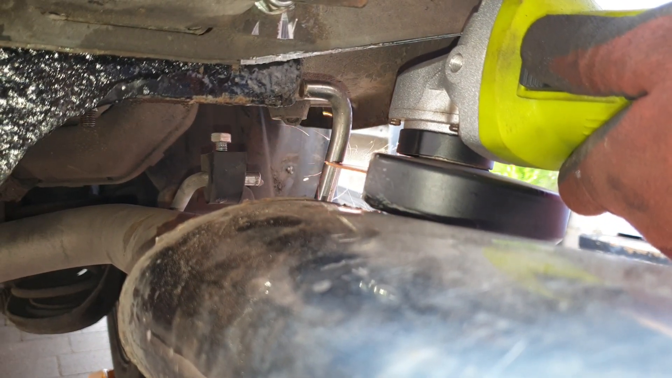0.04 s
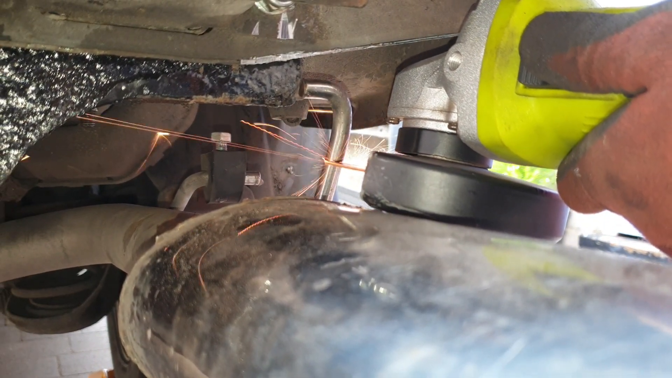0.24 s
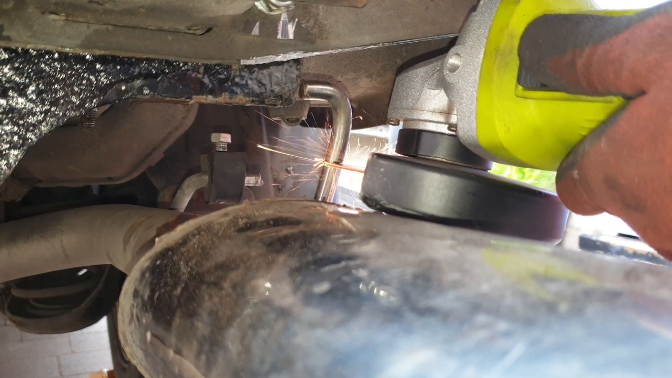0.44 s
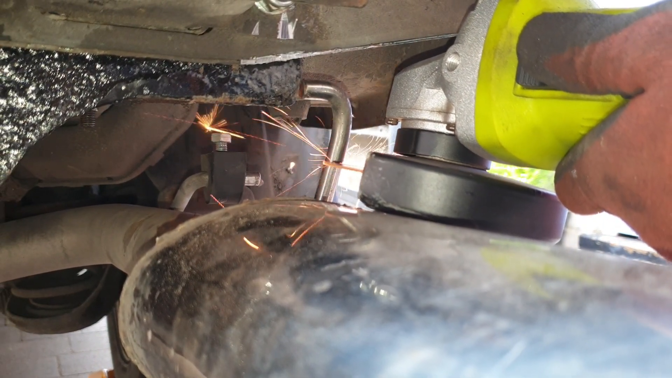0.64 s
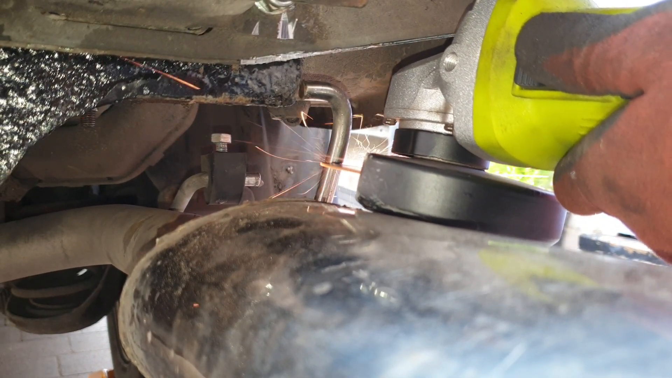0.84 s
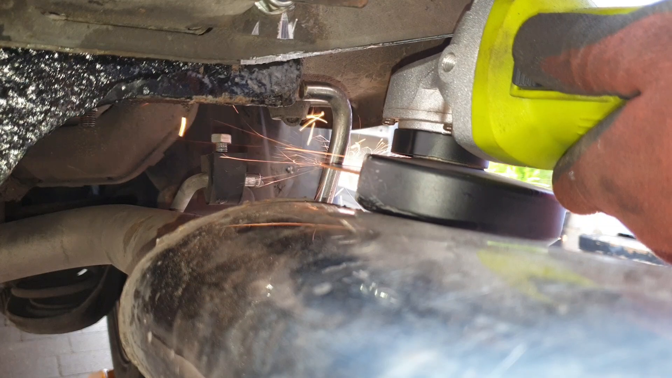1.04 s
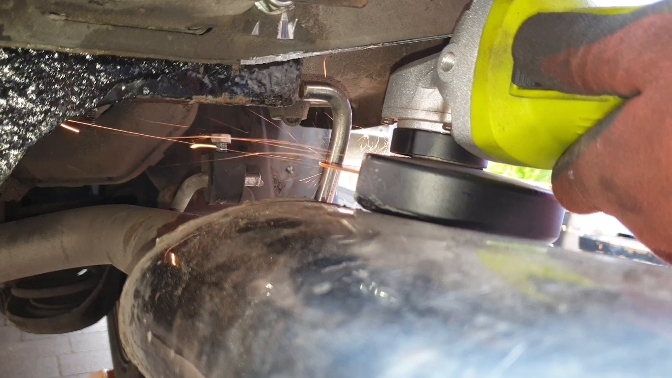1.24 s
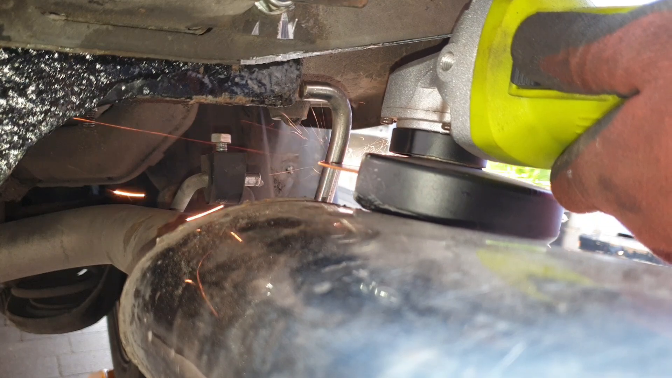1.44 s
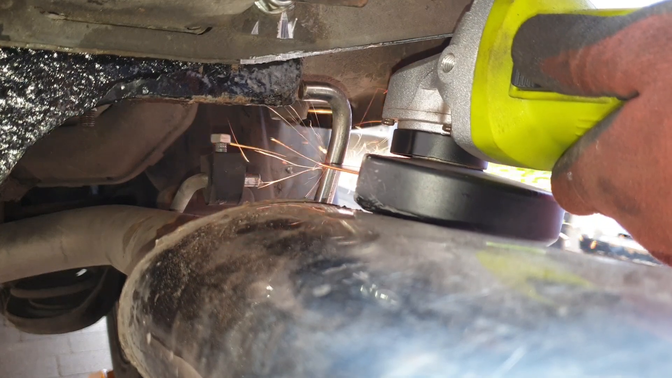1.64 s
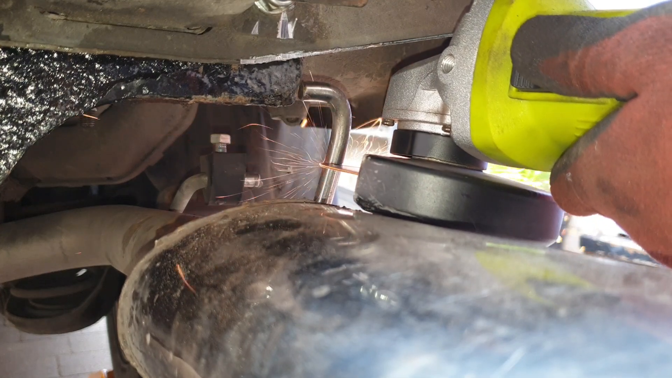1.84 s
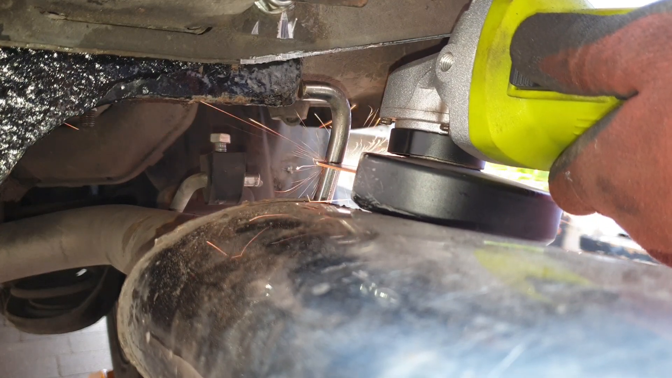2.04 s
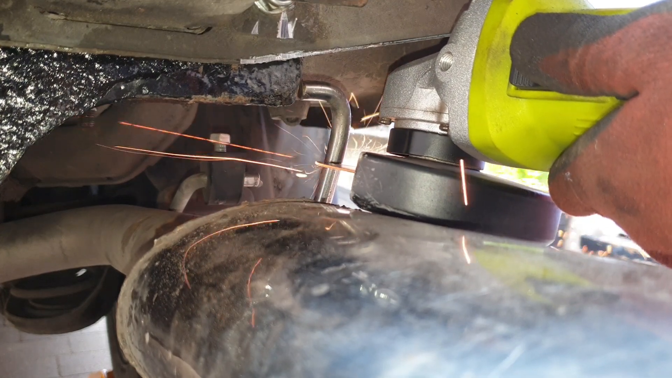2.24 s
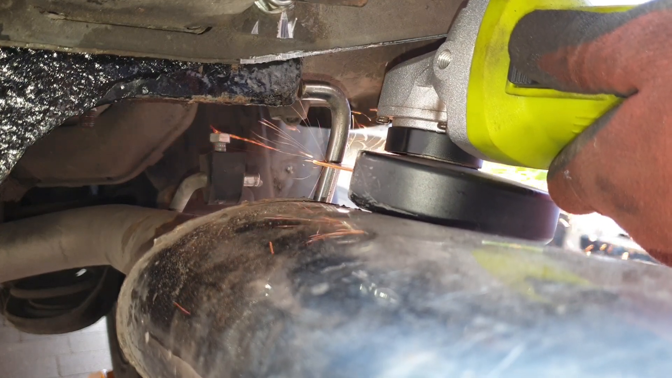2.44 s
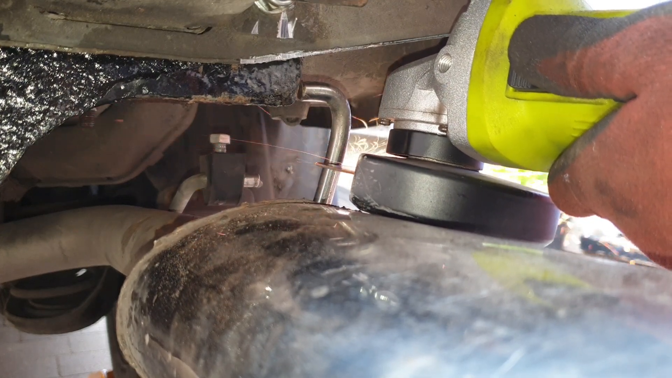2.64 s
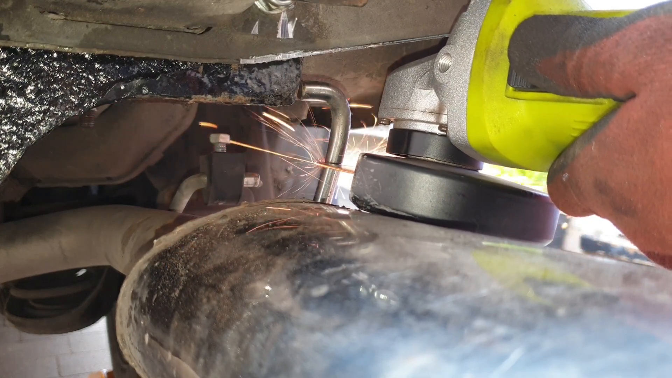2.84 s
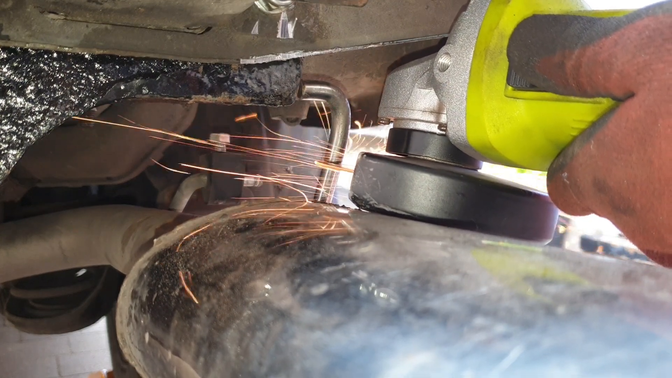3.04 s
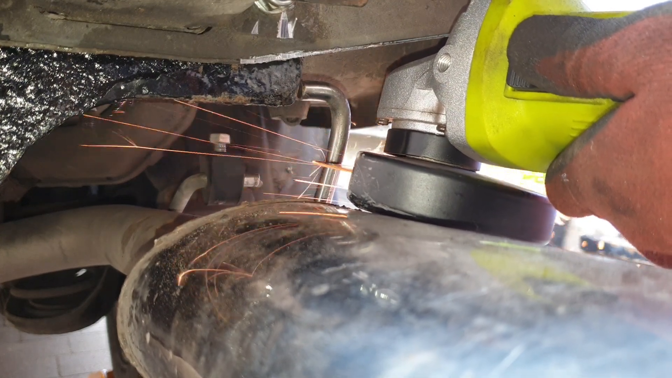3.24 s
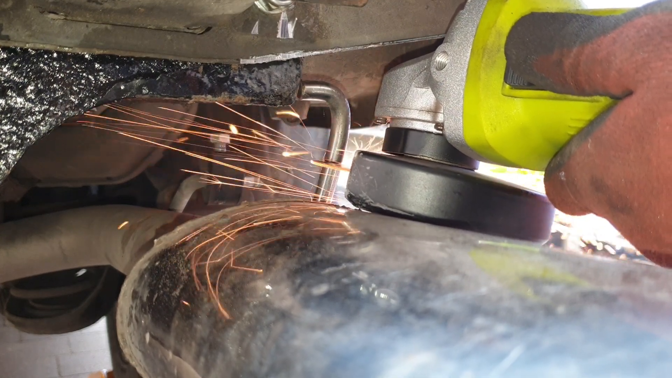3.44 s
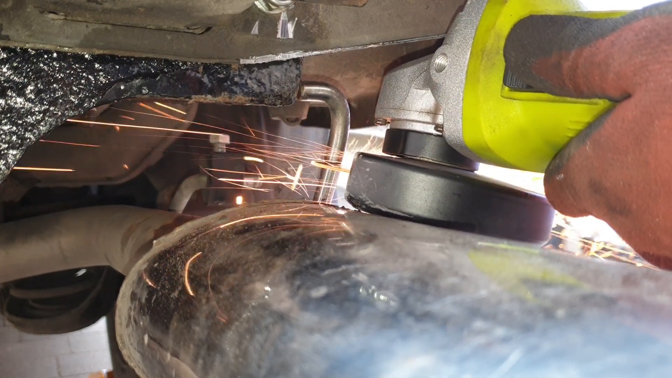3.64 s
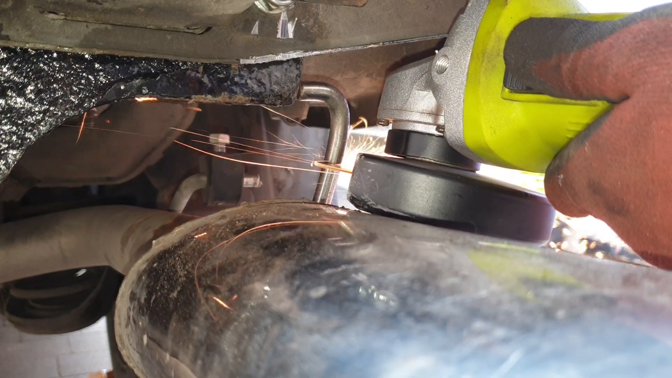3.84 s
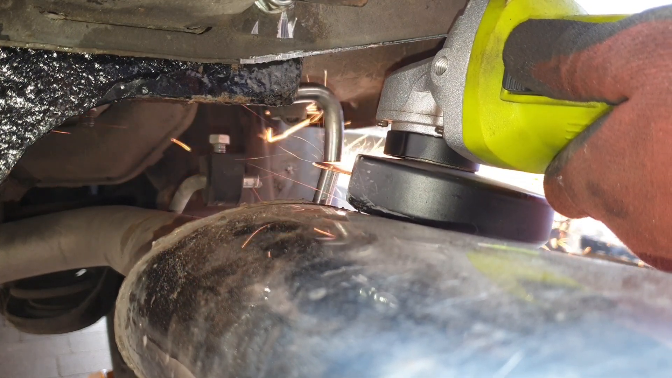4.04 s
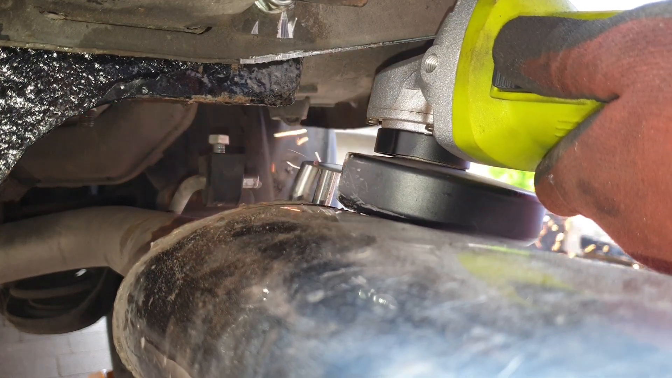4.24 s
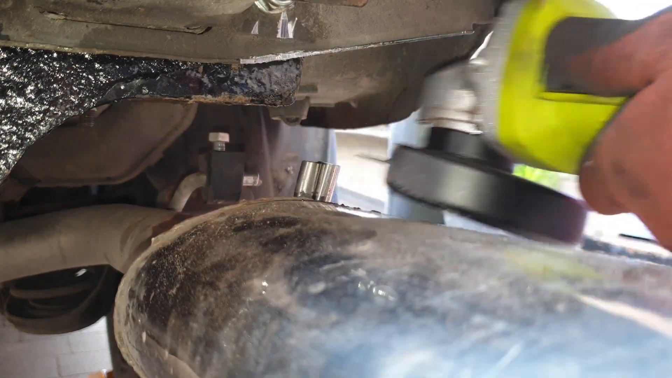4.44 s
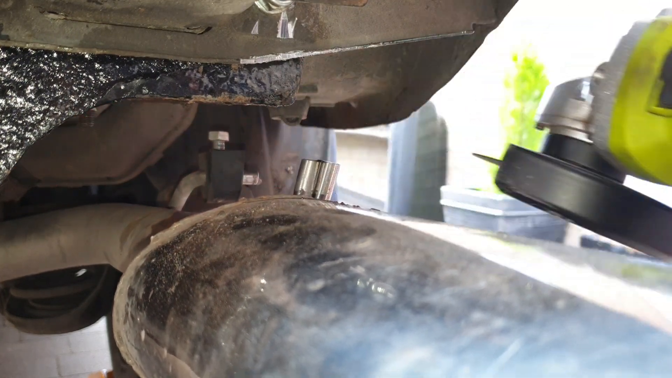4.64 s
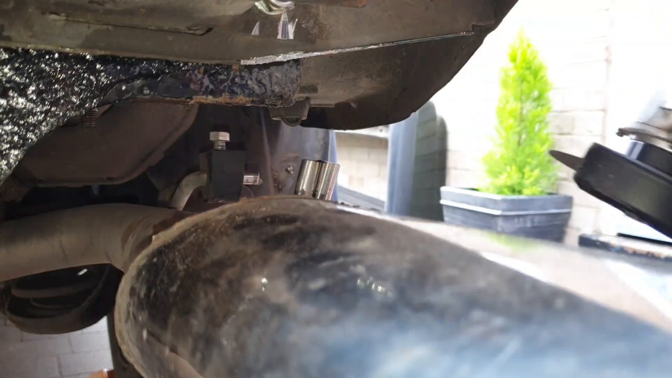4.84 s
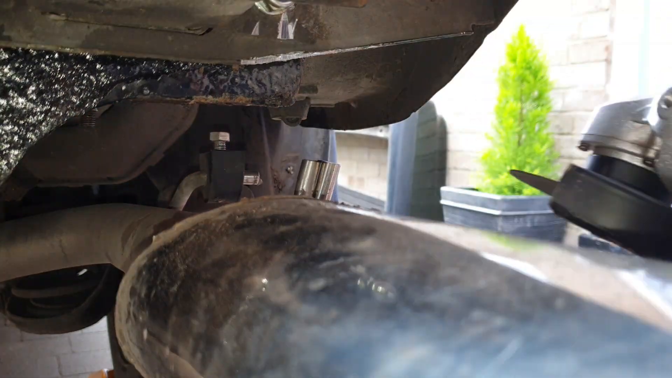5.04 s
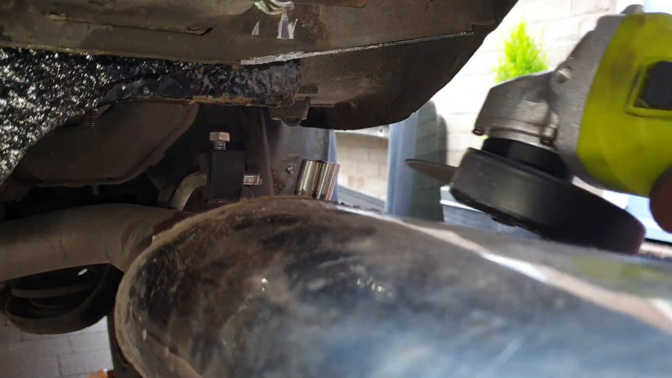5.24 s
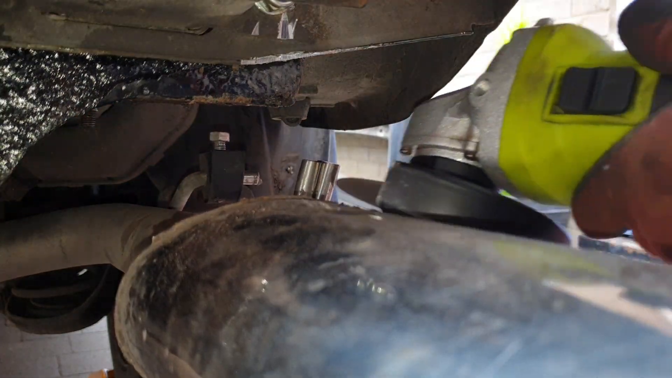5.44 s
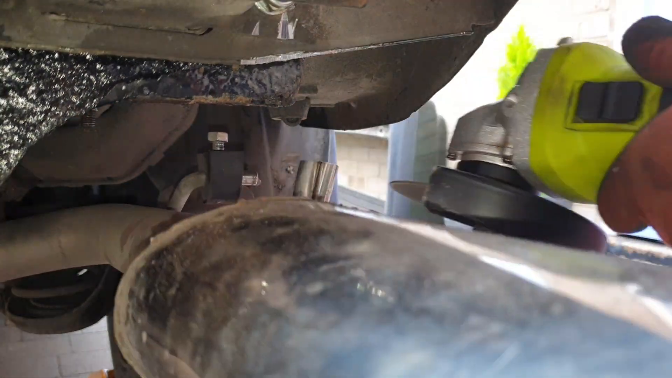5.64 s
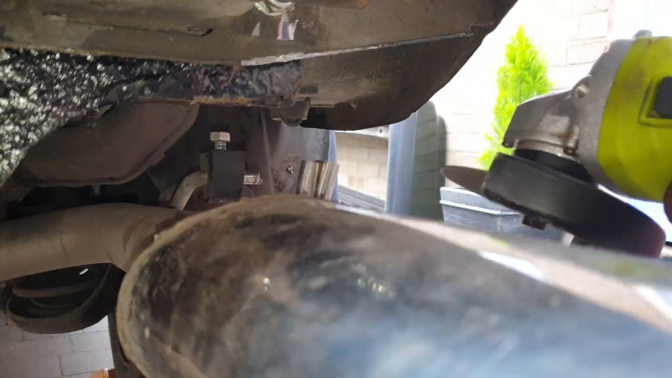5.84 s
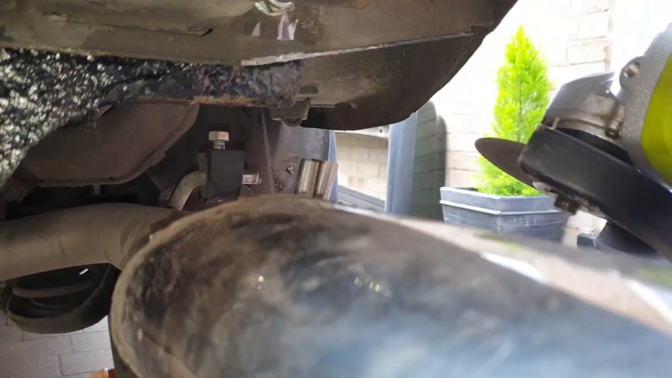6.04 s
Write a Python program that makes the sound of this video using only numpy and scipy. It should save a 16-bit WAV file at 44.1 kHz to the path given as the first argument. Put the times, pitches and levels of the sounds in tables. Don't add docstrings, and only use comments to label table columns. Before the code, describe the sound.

Very close beneath a car, an angle grinder is already cutting steel at 0 s: a loud, dense, bright rasp with a rough pulse, a strained gear whine, and hissing, roaring cooling air. The motor pitch sags until about 2.5 s, partly recovers, dips again near 3.5 s, then climbs. Ringing metallic tones flare and waver throughout, while the bolt's own ring slides downward, fastest from 2.6 to 4.2 s. Sharp ticks and a short ring mark the bolt parting around 4.2-4.4 s. The disc breaks free near 4.5 s; the grinding drops away and the released motor winds down in a falling whine with airy fan noise. Small clicks come at 4.7-4.9 s. At 5.5 s a click and an abrupt, bright scrape of about a tenth of a second brake the disc. A quieter, lower whine and faint ticks fade toward 6.1 s.

```python
import sys
import numpy as np
from scipy import signal
from scipy.fft import rfft, irfft, next_fast_len
from scipy.io import wavfile
from scipy.ndimage import uniform_filter1d, map_coordinates

SR = 44100
rng = np.random.default_rng(int(sys.argv[2]) if len(sys.argv) > 2 else 0)


def inscribe(sig):
    pcm = np.round(np.clip(np.atleast_2d(sig).T, -1, 1) * 32767)
    wavfile.write(sys.argv[1], SR, pcm.astype(np.int16))


def voltage_ratio(decibels):
    exponent = np.asarray(decibels, float) / 20
    return 10 ** exponent


N = 269451
T_S = np.arange(N) / SR
DISC_PER_ROTOR = 11 / 39
MAINS_HZ = 100.3


def unit(x):
    return x / np.sqrt(np.mean(x ** 2) + 1e-20)


def along(points, hz):
    f, v = np.transpose(points)
    return np.interp(np.log(hz + 1), np.log(f + 1), v)


def curves(rows, outside=None):
    s, *cols = np.transpose(rows)
    return [np.interp(T_S, s, c, outside, outside) for c in cols]


def wobble(rate_hz):
    knots = rng.standard_normal(int(N * rate_hz / SR) + 4)
    return map_coordinates(knots, [np.arange(N) * rate_hz / SR], order=1)


def drift(rate_hz, depth_db, count):
    knots = voltage_ratio(depth_db * rng.standard_normal((count, int(N * rate_hz / SR) + 2)))
    at = np.arange(N) * rate_hz / SR
    return np.array([np.interp(at, np.arange(len(row)), row) for row in knots])


def sides(pan_db):
    return unit(voltage_ratio(pan_db * np.array([[.5], [-.5]])))


def filtered(x, response):
    m = next_fast_len(N + 8192)
    return irfft(rfft(x, m) * response(np.fft.rfftfreq(m, 1 / SR)), m)[..., :N]


def humps(modes, hz):
    return np.sqrt(1 + sum(voltage_ratio(2 * db) / (1 + (2 * (hz - c) / w) ** 2) for c, w, db in modes))


# f/Hz, correlation
PORT_LIKENESS = [(300, 0.89), (1000, 0.19), (1750, 0.043), (2400, 0.32), (4500, 0.52), (5100, 0.29),
                 (5800, 0.16), (6500, 0.053), (15000, 0.052)]
# f/Hz, level/dB
PORT_LEAN = [(60, -28), (110, 36), (200, 30.5), (380, 13.5), (700, -1.5), (1290, 0.5), (2380, 4.5),
             (4400, 4), (8120, -1), (15000, -7.5)]


def rush(gain):
    def split(hz):
        turn = np.arccos(np.clip(along(PORT_LIKENESS, hz), -1, 1)) / 2
        return gain(hz) * np.array([np.cos(turn), np.sin(turn)])

    def lean(hz):
        return voltage_ratio(along(PORT_LEAN, hz) * [[.5], [-.5]]) * np.exp([[-.3j], [.3j]])

    mid, side = filtered(rng.standard_normal((2, N)), split)
    return unit(filtered(np.array([mid + side, mid - side]), lean))


def tone(angle, pan_db, flutter_db, lag=0.43, rate=10):
    start = rng.uniform(0, 2 * np.pi) + np.array([[-lag], [lag]])
    return np.sqrt(2) * drift(rate, flutter_db, count=2) * sides(pan_db) * np.sin(angle + start)


# f/Hz, width/Hz, level/dB
FRAME = [(2180, 87, -0.5), (4336, 58, 8), (5590, 264, 6)]
# f/Hz, level per Hz/dB
GRIT = [(300, -54), (700, -17.5), (1400, -9.5), (1700, -8.5), (1910, -4.5), (3480, -4.5), (4310, -3),
        (4790, -6.5), (5680, -6.5), (6600, -9.5), (7430, -14.5), (8170, -45), (9500, -70)]


def grit_colour(hz):
    return voltage_ratio(along(GRIT, hz)) * humps(FRAME, hz)


# t/s, noise level/dB, turn-locked share/dB
CUT = [
    (0.0, -20, -14),
    (0.42, -21, -14.5),
    (1.13, -20.5, -17),
    (2.95, -23.5, -11),
    (3.16, -24, -7),
    (3.9, -22, -14),
    (4.44, -25, -14),
    (4.62, -38, -19),
]


def cutting(angle, disc_hz):
    cut_db, locked_db = curves(CUT, -90)
    high_spot = 1 + 0.05 * np.sin(angle) + 0.074 * np.sin(2 * angle + 0.8)
    torque_ripple = 1 + .17 * np.sin(2 * np.pi * MAINS_HZ * T_S)
    noise_db = cut_db + 2.5 + 0.62 * wobble(11)
    noise = voltage_ratio(noise_db) * high_spot * torque_ripple * rush(grit_colour)
    grid_hz = np.arange(0, 10000., 50)
    shape = grit_colour(grid_hz)
    shape = shape / shape.max()
    harmonics = sum(np.interp(k * disc_hz, grid_hz, shape) * tone(k * angle, 2.4, 5.2) for k in range(7, 50))
    return noise + voltage_ratio(cut_db + locked_db) * harmonics


# t/s, length/s, multiple of disc turn, level/dB
FLARES = [(.666, 0.16, 27, -22), (.79, 0.26, 28, -23.5), (.806, 0.17, 12, -29), (2.62, .1, 13, -27),
          (1.14, .27, 37, -31.5), (1.479, 0.4, 14, -33.5), (1.62, .35, 15, -33), (1.817, 0.15, 40, -30),
          (1.947, .1, 25, -30), (1.958, 0.081, 14, -29.5), (2.04, 0.089, 26, -29.5), (2.213, .14, 25, -28),
          (2.279, 0.098, 12, -26.5), (2.45, .09, 31, -31), (2.689, .09, 44, -29), (2.893, .11, 12, -23.5),
          (3.151, .07, 41, -33), (3.177, 0.086, 18, -24), (3.268, 0.082, 17, -28.5), (3.269, 0.18, 41, -34),
          (3.35, .14, 35, -31), (3.529, .17, 41, -31), (3.812, .14, 7, -37), (3.889, 0.23, 12, -35),
          (4.029, 0.14, 9, -35), (4.05, 0.092, 33, -25.5), (2.85, .55, 10, -37), (4.02, .2, 13, -30)]
# t/s, length/s, multiple of disc turn, level/dB
DRONES = [(0, .95, 4, -41), (.9, 3.3, 6, -45), (.6, 3.15, 7, -43), (0, 1.4, 9, -44), (0, 3.1, 10, -44),
          (0, 2.7, 12, -36), (0, 2.4, 14, -38), (0, .9, 35, -32), (0, 1.1, 37, -34), (3.9, .3, 6, -41)]


def resonant_harmonics(angle):
    sound = np.zeros((2, N))
    for rows, pan_db in ((FLARES, 8), (DRONES, 7.5)):
        for start_s, length_s, k, db in rows:
            end_s = start_s + length_s
            span = slice(max(0, round((start_s - .06) * SR)), round((end_s + 0.065) * SR))
            t = T_S[span]
            ramp = np.minimum(t - start_s + 0.061, end_s + 0.054 - t) / 0.085
            swell = np.clip(ramp, 0, 1) * drift(6.5, 0.61, count=2)[:, span]
            phase = rng.uniform(0, 2 * np.pi) + np.array([[-.4], [.4]])
            line = np.sin(k * angle[span] + phase)
            sound[:, span] += np.sqrt(2) * voltage_ratio(db) * swell * sides(pan_db) * line
    return sound


# t/s, rotor f/Hz, gear mesh level/dB, every-third-tooth level/dB
LOAD = [(0, 578.5, -49, -33), (.62, 562.7, -44, -33.5), (.75, 558, -39, -21.5), (.9, 543.6, -29, -39),
        (1.24, 530, -26, -36), (1.6, 514.8, -20.5, -28), (1.89, 523.5, -23, -24.5),
        (2.1, 510.2, -18.5, -21.5), (2.3, 505.4, -15.5, -18.5), (2.38, 498.2, -18.5, -30),
        (2.52, 496.3, -16.5, -22), (2.8, 517.9, -23.5, -31.5), (3.22, 528.2, -29.5, -34),
        (3.41, 510.6, -18.5, -27.5), (3.55, 508, -20.5, -18.5), (3.82, 529.8, -34, -39),
        (4.1, 557, -49, -26.5), (4.5, 612, -70, -62)]


def rotor():
    off_s = np.maximum(T_S - 4.5, 0)
    coast = .46 * off_s - .035 * off_s ** 2
    braked = .108 * np.interp(T_S, (5.5, 5.6), (0, 1))
    hz = curves(LOAD)[0] * np.exp(-coast - braked)
    inertia_s = .05
    return uniform_filter1d(hz, size=round(inertia_s * SR), mode="nearest")


# t/s, level/dB
FREE_WHINE = [
    (4.3, -43),
    (4.5, -30),
    (4.75, -43),
    (4.95, -39),
    (5.1, -36),
    (5.35, -37.5),
    (5.6, -46),
    (5.8, -35),
    (6.11, -46),
]
# multiple of rotor turn, level/dB
SIDEBANDS = [(10, -47), (10.8, -37), (6.9, -43), (7.46, -40), (8, -53), (3.86, -51)]
# f/Hz, level/dB
HUM_BODY = [(290, -56), (350, -57.5), (425, -43), (490, -51.5), (515, -46), (610, -45.5)]
# f/Hz, level/dB
BLADES = [(9000, -75), (12500, -57), (14400, -47), (15000, -80)]


def motor_whine(angle, rotor_hz):
    _, mesh_db, third_db = curves(LOAD)
    loaded_slot_db = -34.5 + .35 * (third_db + 29.5)
    slot_db = np.where(T_S < FREE_WHINE[0][0], loaded_slot_db, curves(FREE_WHINE)[0])
    sideband_db, = curves([(0, -1), (4.1, 3.5), (4.35, -22)])
    third_turn_db, = curves([(0, -12), (4.6, -1), (5.4, -11), (5.6, -16)])
    slots = voltage_ratio(slot_db) * tone(12 * angle + .5 * wobble(120), -6.0, 2.8, lag=0.92, rate=22)
    unbalance = voltage_ratio(along(HUM_BODY, rotor_hz)) * tone(angle, 2.2, 2.5, rate=5)
    unbalance += voltage_ratio(third_turn_db - 43) * tone(3 * angle, 1.7, 3.08)
    mesh = voltage_ratio(mesh_db) * tone(11 * angle, 1, 2.1)
    mesh += voltage_ratio(third_db) * tone(11 / 3 * angle, 11.6, 3.3)
    mesh += voltage_ratio(sideband_db) * sum(voltage_ratio(db) * tone(k * angle, 5.9, 6.2) for k, db in SIDEBANDS)
    blades = voltage_ratio(along(BLADES, 30 * rotor_hz)) * tone(30 * angle, -8, 2.4)
    return slots + unbalance + mesh + blades


# t/s, low f/Hz, low level/dB, high f/Hz, high level/dB
BOLT = [
    (0, 1905, -40.5, 3804, -33),
    (1.5, 1928, -27.5, 3734, -29),
    (2.3, 1857, -31.5, 3527, -38),
    (2.6, 1825, -24, 3260, -29),
    (2.9, 1740, -29.5, 2988, -30),
    (3.2, 1490, -31, 2678, -32),
    (3.55, 1172, -35.5, 2350, -45),
    (4.15, 947.4, -40, 2120, -52),
    (4.27, 866, -53, 2100, -60),
]


def bolt():
    low_hz, low_db, high_hz, high_db = curves(BOLT, -78)
    part_hz = np.full(N, 2250)
    part_db = -24 - 150 * np.abs(T_S - 4.36)
    modes = ((low_hz, low_db, 80, 6), (high_hz, high_db, 130, 4), (part_hz, part_db, 220, 4))
    ring = 0
    for hz, db, width_hz, pan_db in modes:
        a, b = filtered(rng.standard_normal((2, 2, N)), lambda f: 1 / (1 + (f / width_hz) ** 2))
        angle = 2 * np.pi * np.cumsum(hz) / SR
        carried = a * np.cos(angle) + b * np.sin(angle)
        ring = ring + voltage_ratio(db) * unit(voltage_ratio([[pan_db / 2], [-pan_db / 2]]) * carried)
    return ring


# f/Hz, level/dB
SCRAPE = [(240, -65), (400, -35), (432, -53), (510, -23), (816, -16), (1170, -10), (1800, -8), (2120, -6.5),
          (3340, -10.5), (3830, -5.5), (4880, -9.5), (6820, -5), (8690, -34), (13500, -7), (15000, -28)]
# f/Hz, width/Hz, level/dB
SCRAPE_RING = [(1200, 100, 4), (1500, 120, 3), (2100, 220, 5), (3880, 110, 3), (4250, 100, 4),
               (13000, 200, 6)]


def brush(angle):
    start_s, attack_s, hold_s = 5.515, .005, .073
    sag_db, lift_db, fall_db_per_s = 4, 5, 280
    scrape = rush(lambda hz: voltage_ratio(along(SCRAPE, hz)) * humps(SCRAPE_RING, hz))
    mesh = voltage_ratio(-11) * tone(39 * angle + .9 * wobble(200), 2, 3.5, rate=67)
    u = T_S - start_s - attack_s
    knots_s = (-attack_s, 0, hold_s, hold_s + 0.0065)
    held_db = np.interp(u, knots_s, (-26, 0, -sag_db, -sag_db - lift_db), -80)
    level_db = -13.5 + held_db - fall_db_per_s * np.maximum(u - hold_s, 0)
    return voltage_ratio(level_db + 1.2 * wobble(150)) * (1 + 0.075 * np.sin(angle)) * (scrape + mesh)


# t/s, peak level/dB, t60/s, centre f/Hz
TICKS = [(4.218, -13, .008, 4000), (4.258, -15, .03, 12000), (4.372, -15, .008, 4000),
         (4.718, -16, .006, 5500), (4.814, -20, .015, 5000), (4.851, -18, .006, 5000),
         (5.466, -23, .015, 5000), (5.503, -16, .008, 4500), (5.517, -12, .006, 13000),
         (5.638, -24, .015, 5500), (5.693, -29, .02, 4000), (5.768, -22, .02, 5500),
         (5.86, -28, .015, 5000), (5.89, -26, .04, 8000), (5.94, -27, .02, 6000), (6.004, -27, .02, 4500)]


def ticks():
    out, t = np.zeros((2, N + SR)), np.arange(SR // 10) / SR
    f = np.fft.rfftfreq(len(t), 1 / SR)
    notch = 1 - np.exp(-(np.log((f + 1) / 9000) / .13) ** 2)
    for s, db, t60_s, hz in TICKS:
        band = np.exp(-(np.log((f + 1) / hz) / 0.52) ** 2)
        crack = irfft(rfft(rng.standard_normal((2, len(t)))) * band * notch, len(t))
        out[:, round(s * SR):][:, :len(t)] += voltage_ratio(db - 5.0 - 60 * t / t60_s) * unit(crack)
    return out[:, :N]


# t/s, level/dB
AIR = [(0, -25.5), (.4, -27.5), (1.2, -28), (1.6, -28.5), (2.5, -31), (4.1, -31), (4.45, -32), (4.7, -34.5),
       (4.95, -38.5), (5.45, -38.5), (5.62, -46), (6.11, -50)]


def air_swing_db():
    return curves(AIR)[0] - AIR[4][1]


# f/Hz, level/dB
FAN = [(300, -52), (800, -14.5), (1200, -4), (1700, -2.5), (2400, 2), (3400, -1), (4600, -0.5),
       (5600, -0.5), (6800, -7), (7600, -17), (8400, -29), (9500, -58)]


def free_fan():
    clear = np.interp(T_S, (3.94, 4.56), (0, 1))
    level_db = -23 + 0.66 * air_swing_db() + 0.95 * wobble(32)
    return clear * voltage_ratio(level_db) * rush(lambda hz: voltage_ratio(along(FAN, hz)))


# f/Hz, level/dB
HISS = [(4410, -37), (7500, 0), (8110, -10), (8570, -12), (9970, -4.5), (11800, 3.5), (13900, 2.5),
        (14700, -7), (15000, -58)]


def vent_hiss():
    powered, = curves([(0, 0.17), (4.49, 0.3), (4.52, 0.062)])
    buzz = 1 + .33 * powered * np.sin(2 * np.pi * MAINS_HZ * T_S)
    level_db = curves(AIR)[0] + 1.1 * wobble(7.03)
    return voltage_ratio(level_db) * buzz * rush(lambda hz: voltage_ratio(along(HISS, hz)))


# f/Hz, level/dB
ROAR = [(35, -64), (60, -27), (146, -28.5), (318, -18), (512, -2), (784, -6), (1020, 2), (1200, -2.5),
        (1560, -66), (2640, -120)]


def housing_roar():
    level_db = -37.5 + 0.56 * air_swing_db() + 1.78 * wobble(17)
    return voltage_ratio(level_db) * rush(lambda hz: voltage_ratio(along(ROAR, hz)))


# t/s, level/dB
SHIFTS = [
    (0, -73),
    (.7, -53),
    (.9, -45),
    (1.3, -49.5),
    (1.5, -71),
    (4.2, -68),
    (4.5, -54.5),
    (5.5, -61),
    (5.65, -59),
]


def handling():
    level_db, = curves(SHIFTS)
    floor = [(20, -25), (70, 3), (200, -9), (400, -24), (800, -90)]  # f/Hz, level/dB
    return voltage_ratio(level_db + 5.1 * wobble(17)) * rush(lambda hz: voltage_ratio(along(floor, hz)))


def scene():
    rotor_hz = rotor()
    angle = 2 * np.pi * np.cumsum(rotor_hz) / SR
    disc_angle = DISC_PER_ROTOR * angle
    cut = cutting(disc_angle, DISC_PER_ROTOR * rotor_hz) + resonant_harmonics(disc_angle)
    contacts = bolt() + brush(disc_angle) + ticks()
    air = free_fan() + vent_hiss() + housing_roar()
    return cut + motor_whine(angle, rotor_hz) + contacts + air + handling()


def top_cut(x):
    return signal.sosfilt(signal.butter(12, 15640, fs=SR, output="sos"), x)


# f/Hz, level/dB
PORTS = [(30, -32), (120, -3), (300, -1), (7400, 0), (8700, 4.5), (10500, 1.5), (14550, 0.5), (15000, -32),
         (17000, -40), (19000, -70)]


def record(dry):
    mix = filtered(dry, lambda hz: voltage_ratio(along(PORTS, hz)))
    return top_cut(mix)


dry = scene()
out = record(dry)
inscribe(out)
```